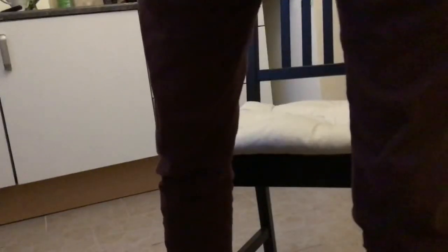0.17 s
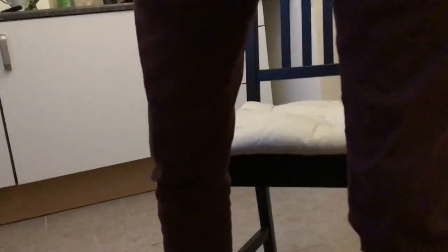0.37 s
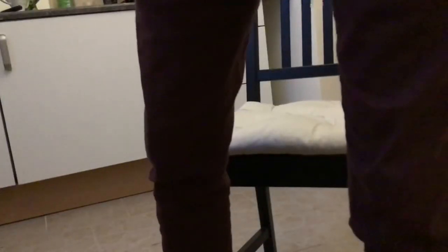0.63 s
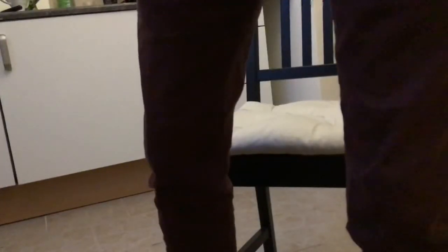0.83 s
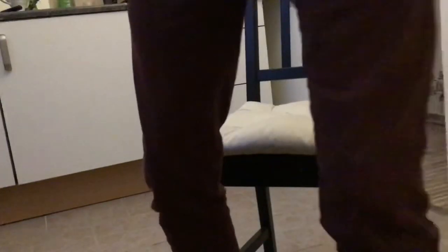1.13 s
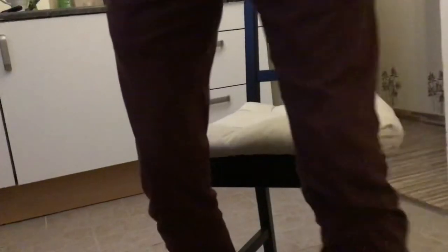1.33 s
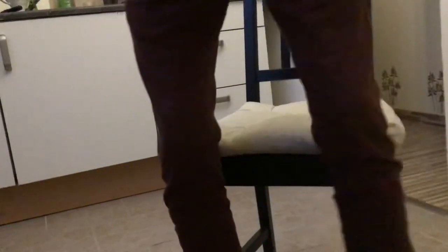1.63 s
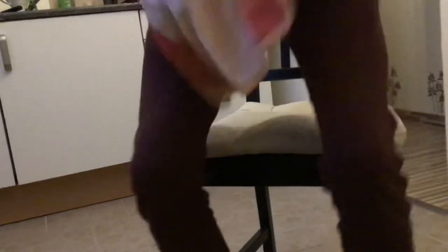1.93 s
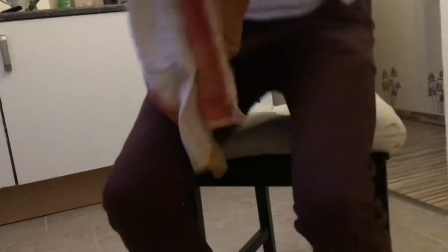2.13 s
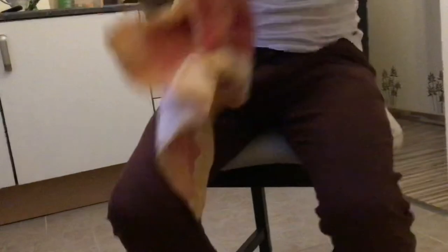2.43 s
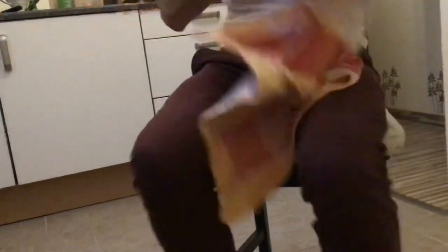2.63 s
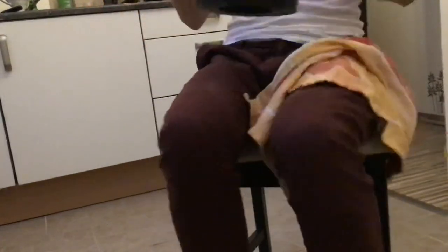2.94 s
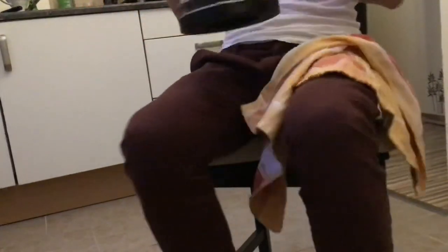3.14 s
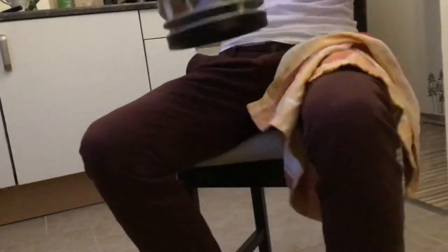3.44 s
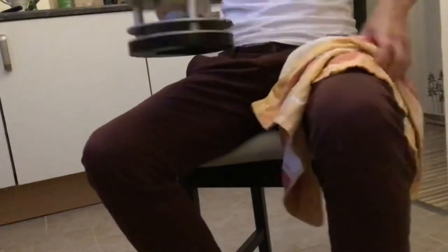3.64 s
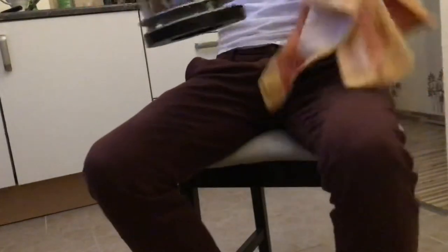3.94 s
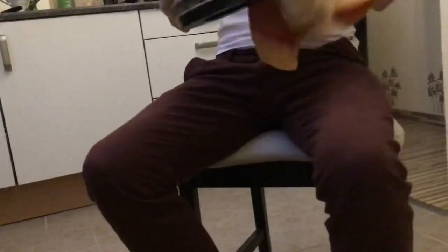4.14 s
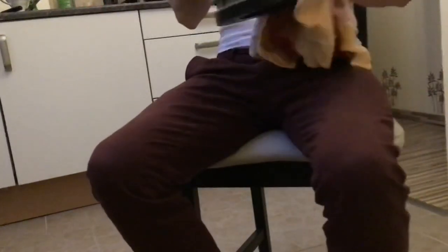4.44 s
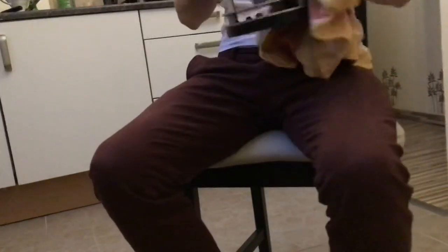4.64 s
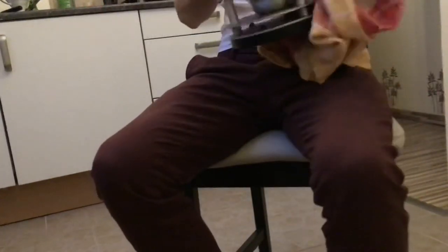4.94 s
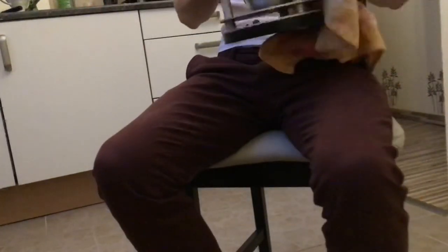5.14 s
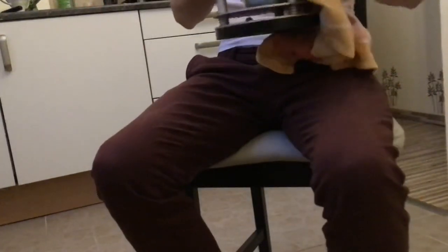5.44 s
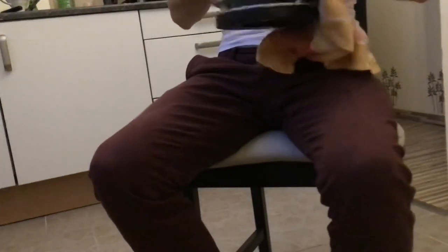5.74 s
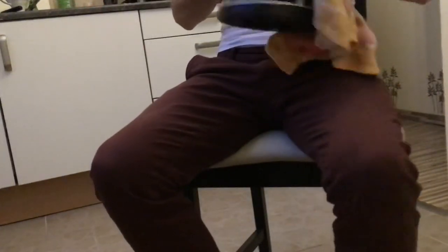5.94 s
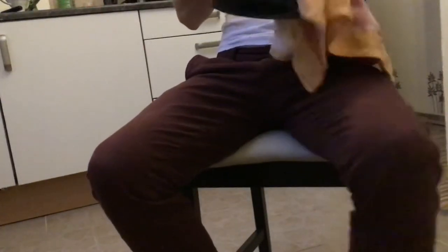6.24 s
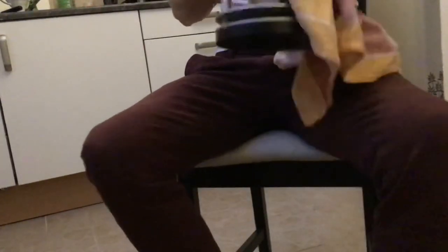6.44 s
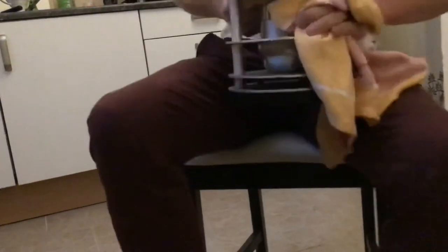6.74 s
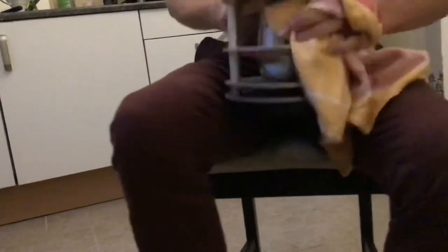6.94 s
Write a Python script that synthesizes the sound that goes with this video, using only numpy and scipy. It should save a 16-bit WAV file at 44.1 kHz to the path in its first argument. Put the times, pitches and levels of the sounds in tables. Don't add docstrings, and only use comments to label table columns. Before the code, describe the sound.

Close to the microphone, loose metal parts tick and jingle, then pause. A chair slightly further off knocks loudly on hard tiles and shifts under a sitter. A towel rustles softly while the grinder rattles lightly, then clatters sharply in one burst. After a quiet gap come single clinks, and finally chair legs thud and grate over the floor. A faint fridge hum runs throughout.

```python
import sys
import numpy as np
from scipy import signal
from scipy.fft import rfft, irfft, next_fast_len
from scipy.io import wavfile
from scipy.ndimage import map_coordinates

SR = 44100
rng = np.random.default_rng(int(sys.argv[2]) if len(sys.argv) > 2 else 0)


def wav_out(sig):
    wavfile.write(sys.argv[1], SR, np.round(np.clip(np.atleast_2d(sig).T, -1, 1) * 32767).astype(np.int16))


def gain_from_decibels(decibels):
    exponent = np.asarray(decibels, float) / 20
    return 10 ** exponent


N = 312669


def unit(x):
    return x / np.sqrt(np.mean(x ** 2) + 1e-20)


def along(points, hz):
    point_hz, value = np.transpose(points)
    return np.interp(np.log(hz + 1), np.log(point_hz + 1), value)


def curves(tables):
    gains, t = 0, np.arange(N) / SR
    fade_s = 0.02
    for rows in tables:
        start_s, *columns_db = np.transpose(rows)
        inside_s = np.minimum(t - start_s[0], start_s[-1] - t)
        fade = np.clip(inside_s / fade_s + 1, 0, 1)
        gains = gains + fade * gain_from_decibels([np.interp(t, start_s, db) for db in columns_db])
    return gains


def filtered(x, response):
    size = next_fast_len(N + SR // 2)
    spectrum = rfft(x, size) * response(np.fft.rfftfreq(size, 1 / SR))
    return irfft(spectrum, size)[..., :N]


def coloured(x, spectrum):
    return unit(filtered(x, lambda hz: gain_from_decibels(along(spectrum, hz))))


def resonant(x, modes):
    def response(hz):
        total = 0
        for k, (centre_hz, width_hz, db) in enumerate(modes):
            damping = 1j * hz * width_hz
            total = total + (-1) ** k * gain_from_decibels(db) * damping / (centre_hz ** 2 - hz ** 2 + damping)
        return total
    return unit(filtered(x, response))


def grains(rate_hz, spread_db, bed):
    hit = rng.random(N) < rate_hz / SR
    size = gain_from_decibels(spread_db * rng.exponential(size=N))
    impacts = unit(hit * size * rng.standard_normal(N))
    return impacts + bed * rng.standard_normal(N)


def ring(modes, t, scatter_db):
    hz, width_hz, db = np.transpose(modes)[:, :, None]
    strength, detune = rng.standard_normal((2, len(modes), 1))
    decay = np.exp(-np.pi * width_hz * t)
    tone = np.sin(2 * np.pi * hz * (1 + 0.0058 * detune) * t)
    x = (gain_from_decibels(db + scatter_db * strength) * decay * tone).sum(0)
    return x / np.abs(x).max()


def band_noise(noise, low_hz, high_hz):
    return signal.lfilter(*signal.butter(1, [low_hz, high_hz], "band", fs=SR), noise)


# frequency in Hz, level in dB rms.
HUM = [(48.4, -70), (96.9, -66.5), (242.2, -77.5)]
# frequency in Hz, level in dB per Hz.
AIR = [(21, -38), (35, -6.5), (103, -7), (147, -11), (252, -11), (431, -18.5), (778, -25.5), (930, -32),
       (1440, -24.5), (2010, -27.5), (2220, -24.5), (3100, -33), (7230, -35.5), (9100, -38.5), (16000, -46)]


def fridge():
    t = np.arange(N) / SR

    def waver(rate_hz):
        points = rng.standard_normal(int(N * rate_hz / SR) + 4)
        return map_coordinates(points, [t * rate_hz])

    hum = 0
    for hz, db in HUM:
        level = gain_from_decibels(db + 3 + 1.1 * waver(3.3))
        hum = hum + level * np.sin(2 * np.pi * hz * t + 0.43 * waver(4.3))
    air = gain_from_decibels(-68.5 + 0.5 * waver(2.07)) * coloured(rng.standard_normal(N), AIR)
    return hum + air


# time in seconds, base in dB, plates in dB, rods in dB.
RATTLE = [
    [(0.0, -77, -58, -74), (0.114, -66, -71, -63), (0.184, -87, -74, -77), (0.24, -57, -75, -72),
     (0.3, -75, -72, -68), (0.38, -88, -72, -57), (0.406, -74, -84, -69), (0.578, -83, -71, -71),
     (0.63, -81, -69, -74), (0.704, -67, -67, -74), (0.852, -97, -87, -65), (1.018, -72.5, -83, -79),
     (1.088, -95, -81, -76), (1.12, -82, -81, -78), (1.15, -70, -78, -80)],
    [(2.8, -67, -72, -82), (2.834, -72, -75, -82), (2.87, -65, -67, -79), (2.992, -82, -65, -80),
     (3.08, -69, -61, -73), (3.094, -75, -66, -79), (3.212, -72.5, -68, -77), (3.318, -86, -63, -69),
     (3.372, -83, -66, -69), (3.4, -87, -68, -61)],
    [(4.05, -90, -85, -88), (4.112, -75, -70, -86), (4.208, -70, -66, -83), (4.234, -74, -67, -74),
     (4.382, -81, -74, -77), (4.41, -86, -71, -81), (4.454, -61, -60, -82), (4.5, -66.5, -72.5, -87)],
    [(4.56, -70, -73, -74), (4.684, -90, -64, -73), (4.74, -42, -67, -71), (4.794, -42.5, -63, -63),
     (4.834, -41.5, -60, -68), (4.874, -50, -56, -69), (4.9, -66, -56, -57), (5.0, -62, -64, -67)],
    [(5.8, -74, -67, -71), (5.94, -65, -55, -60), (5.974, -72, -76, -77), (5.992, -83, -65, -79),
     (6.098, -92, -61, -77), (6.124, -66, -78, -74), (6.24, -87, -69, -84), (6.268, -83, -68, -82),
     (6.3, -71, -66, -76)],
]
# frequency in Hz, width in Hz, level in dB.
BASE = [(282, 29, 0)]
PLATES = [(1010, 29, -6), (1190, 33, -4), (1319, 27, -5.5), (1384, 19, -4.5), (1468, 23, -5),
          (1562, 18, -6.5)]
HOPPER = [(2152, 34, -4.5), (2246, 18.7, 1.5), (2293, 25, -2.5), (2429, 24, -7), (2625, 24.5, -7)]
RODS = [(3770, 53, -8), (4086, 70, -2.5), (4384, 94, 0), (4940, 250, 4), (5580, 220, 2.5), (6220, 130, 3.5)]


def rattle():
    base, plates, rods = curves(RATTLE)
    shake = grains(rate_hz=400, spread_db=3.5, bed=0.57)
    x = gain_from_decibels(-9) * plates * resonant(shake, PLATES + HOPPER)
    x += gain_from_decibels(-9) * rods * resonant(shake, RODS)
    x += gain_from_decibels(1) * base * resonant(shake, BASE)
    return x


# time in seconds, fine grains in dB, coarse grains in dB.
RUSTLE = [(0.0, -71.5, -73), (0.1, -68.5, -83), (0.22, -78, -77), (0.28, -68, -70), (0.41, -86, -88),
          (0.65, -68.5, -79), (0.75, -70, -84), (0.89, -78, -92), (1.05, -84.5, -84), (1.42, -84, -74.5),
          (1.62, -89, -77), (1.76, -78.5, -67), (2.13, -80.5, -75.5), (2.35, -79, -82), (2.43, -65, -69),
          (2.55, -82, -63.5), (2.84, -80.5, -73), (3.06, -75, -62), (3.2, -87, -69), (3.3, -67, -77),
          (3.59, -80.5, -69.5), (4.52, -83.5, -74), (4.68, -78, -74), (4.76, -67, -69), (4.82, -79, -64),
          (4.88, -73, -55), (4.91, -72, -58), (5.01, -81, -68), (5.07, -87, -74.5), (5.29, -80, -72),
          (5.39, -82, -77), (5.59, -84, -73), (6.0, -79.5, -76), (6.26, -78, -72), (6.57, -78.5, -70),
          (6.63, -75, -70), (6.71, -74, -61), (6.77, -76, -56), (6.85, -74, -45), (6.97, -74, -65),
          (7.09, -85, -64)]
# frequency in Hz, level in dB per Hz.
FINE = [(1470, -26), (2500, -4), (2900, -3), (5150, 0), (7130, -11), (8870, -1.5), (10400, -10),
        (16000, -6)]
COARSE = [(180, -37), (300, -2.5), (447, -8.5), (666, -9), (1360, -12.5), (2430, -17.5), (9000, -32),
          (11700, -60), (19800, -120)]


def cloth():
    fine, coarse = curves([RUSTLE])
    bright = coloured(grains(rate_hz=2300, spread_db=3.5, bed=1.0), FINE)
    dull = coloured(grains(rate_hz=900, spread_db=3, bed=1.0), COARSE)
    return gain_from_decibels(-0.5) * fine * bright + gain_from_decibels(-4.5) * coarse * dull


# start in seconds, rods in dB, plates in dB, hopper in dB,
# snap in dB, struck plate pitch in Hz.
TICKS = [(0.0887, -51, -59.5, -59.5, -62, 1010), (0.1361, -42.5, -42.5, -52.5, -61, 1010),
         (0.155, -46, -67, -63, -52, 1030), (0.174, -61, -65, -73, -68, 1380),
         (0.2442, -40, -44, -52, -43, 1434), (0.2614, -46, -55.5, -68, -60, 1240),
         (0.2832, -43, -62, -47.5, -60, 1240), (0.2903, -46, -48, -49.5, -59, 1420),
         (0.3553, -41, -71, -63, -66, 1420), (0.387, -63, -69, -68, -53, 1355),
         (0.4125, -49, -68, -77, -43, 1425), (0.4354, -67, -78, -77, -61, 1000),
         (0.6353, -40.5, -66, -79, -45, 1360), (0.6952, -30.5, -65, -40.5, -47, 1390),
         (0.7157, -54, -50.5, -49, -69, 1380), (0.7562, -55, -68, -70, -68, 1230),
         (0.8026, -38.5, -74, -66, -59, 1440), (0.842, -61, -79, -72, -58, 1440),
         (0.9778, -61.5, -69, -54.5, -73, 1122), (2.7799, -69, -61, -64, -80, 1330),
         (2.8748, -53.5, -46.5, -45, -64, 1250), (3.0133, -48, -52.5, -50, -73, 1280),
         (3.1396, -66, -57, -62, -80, 1320), (3.55, -62, -58.5, -63.5, -84, 1220),
         (3.704, -58, -71, -61.5, -82, 1380), (4.0992, -75, -73, -74, -84, 1250),
         (4.4264, -61, -57, -63, -73, 1223), (4.592, -44.5, -57, -51.5, -62, 1320),
         (4.7122, -48, -44, -46.5, -66, 1370), (4.7321, -45, -40, -29.5, -65, 1313),
         (4.7509, -33, -29.5, -40, -51, 1320), (4.7912, -28, -29.5, -32, -37, 1290),
         (4.8, -26.5, -30.5, -37, -37, 1306), (4.8141, -26, -28, -32.5, -44, 1575),
         (4.8323, -35, -31.5, -30.5, -46, 1284), (4.8434, -27, -33, -37.5, -51, 1310),
         (5.59, -62, -67, -74, -79, 1210), (5.912, -33, -59, -44.5, -42.5, 995),
         (5.9576, -57, -45.5, -43.5, -67, 1167), (6.52, -68, -50.5, -65, -79, 1205),
         (6.5905, -47.5, -43.5, -58, -57, 1100)]
# frequency in Hz, width in Hz, level in dB.
SNAP = [(8020, 185, 3), (9150, 410, 11), (11000, 900, -15), (14300, 1500, -14)]


def ticks():
    out, t = np.zeros(N + SR), np.arange(SR // 5) / SR
    for start_s, rods_db, plates_db, hopper_db, snap_db, plate_hz in TICKS:
        struck_plates = [(plate_hz, 22, 6)] + PLATES
        x = gain_from_decibels(plates_db + 4.5) * ring(struck_plates, t, scatter_db=3)
        x += gain_from_decibels(hopper_db + 5.5) * ring(HOPPER, t, scatter_db=4.5)
        x += gain_from_decibels(rods_db + 3) * ring(RODS, t, scatter_db=11.5)
        x += gain_from_decibels(snap_db + 6) * ring(SNAP, t, scatter_db=5.5)
        out[round(start_s * SR):][:len(t)] += x
    return out[:N]


# start in seconds, wood in dB, floor boom in dB,
# edge in dB, crack in dB, wood pitch in Hz.
KNOCKS = [(1.179, -60, -66, -81, -74, 140), (1.343, -43, -61, -72, -67, 172),
          (1.429, -57, -63, -77, -77, 145), (1.583, -22, -40.5, -34, -48, 336),
          (1.607, -19, -46, -40, -54, 274), (1.639, -23, -48, -53, -61, 196),
          (1.989, -38.5, -45, -68, -65, 160.6), (2.089, -55, -58, -73, -68, 197),
          (2.153, -39, -58, -80, -75, 158), (2.219, -52, -66, -74, -77, 307),
          (2.305, -48, -63, -69, -60, 163), (2.402, -48, -65, -48.5, -53, 173),
          (2.443, -33.5, -54, -50.5, -59, 149), (2.612, -42.5, -64, -68.5, -80, 255),
          (2.669, -48, -66, -69, -81, 199), (2.818, -54, -66, -76, -78, 132),
          (6.531, -40, -71, -53, -69, 226), (6.55, -31, -62, -43.5, -65, 263),
          (6.797, -27, -62, -51.5, -65, 153), (6.89, -30.5, -59, -51.5, -66, 151),
          (6.959, -36.5, -62, -53, -63, 205), (7.029, -46, -53, -66, -68, 210)]


def knocks():
    out, t = np.zeros(N + SR), np.arange(SR // 3) / SR
    for start_s, wood_db, boom_db, edge_db, crack_db, wood_hz in KNOCKS:
        edge_noise, crack_noise = rng.standard_normal((2, len(t)))
        boom_rise = 1 - np.exp(-t / 0.011)
        wood = [(wood_hz, 22, 4), (155, 20, 0), (204, 16, 0), (275, 22, 0), (380, 30, -6)]
        x = gain_from_decibels(boom_db + 7) * ring([(57.4, 5.4, 0)], t, scatter_db=0) * boom_rise
        x += gain_from_decibels(wood_db) * ring(wood, t, scatter_db=3)
        x += gain_from_decibels(edge_db - 1) * band_noise(edge_noise, 400, 1500) * 4.4 * np.exp(-t / 0.015)
        x += gain_from_decibels(crack_db - 7) * band_noise(crack_noise, 2000, 7000) * 1.9 * np.exp(-t / 0.013)
        out[round(start_s * SR):][:len(t)] += x
    return out[:N]


# time in seconds, force in dB, grit in dB re force.
DRAG = [
    [(2.33, -72, -7), (2.364, -67, 8), (2.41, -54, -8), (2.43, -50, 0), (2.448, -43, -11),
     (2.598, -67.5, -13), (2.616, -52, -17), (2.722, -62, -14), (2.8, -62, -8)],
    [(6.48, -72, 0), (6.52, -70, 1), (6.534, -43, -14), (6.552, -44.5, -14), (6.674, -58.5, 4.5),
     (6.72, -50, -5), (6.808, -40.5, -9), (6.846, -35, -19), (6.914, -41.5, -11), (7.09, -66, -5)],
]
# frequency in Hz, width in Hz, level in dB.
SEAT = [(151, 65, -0.5), (519.6, 42, -2.5), (980, 42, -25), (1146, 34, -10)]


def drag():
    force, grit = curves(DRAG)
    slips = grains(rate_hz=130, spread_db=4.5, bed=0.57)
    hiss = coloured(grains(rate_hz=1700, spread_db=4.5, bed=0.93), COARSE)
    return force * (gain_from_decibels(-4) * resonant(slips, SEAT) + gain_from_decibels(-4) * grit * hiss)


# frequency in Hz, 60 dB decay time in seconds.
KITCHEN = [(60, 0.68), (200, 0.41), (1000, 0.48), (4000, 0.44), (12000, 0.27)]


def room(x, wet_db):
    hz, t, bins = signal.stft(rng.standard_normal(SR * 3 // 4), SR, nperseg=256)
    decay = gain_from_decibels(-60 * t / along(KITCHEN, hz)[:, None])
    tail = signal.istft(bins * decay, SR, nperseg=256)[1]
    tail = tail * (1 - np.exp(-np.arange(len(tail)) / SR / 0.0038))
    tail = tail / np.linalg.norm(tail)
    return x + gain_from_decibels(wet_db) * signal.fftconvolve(x, tail)[:N]


def scene():
    grinder = room(ticks(), wet_db=-2.5) + room(rattle() + cloth(), wet_db=-2.5)
    chair = room(knocks() + drag(), wet_db=-0.5)
    mix = grinder + gain_from_decibels(-3) * chair + fridge()
    return mix[None]


def band_limit(x):
    return signal.sosfilt(signal.butter(12, 16660, fs=SR, output="sos"), x)


def record(dry):
    mix = filtered(dry, lambda hz: 1 / (1 + (36 / (hz + 1)) ** 8))
    return band_limit(mix)


dry = scene()
out = record(dry)
wav_out(out)
```